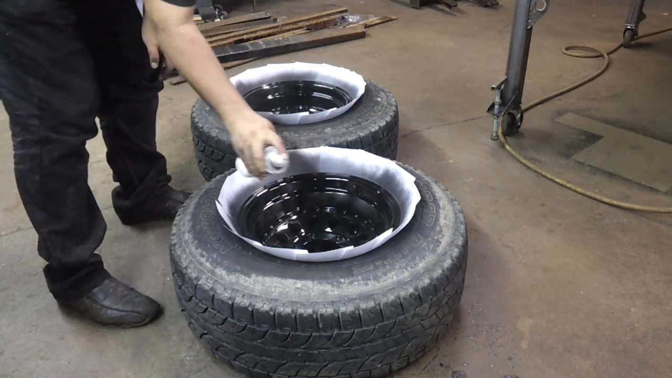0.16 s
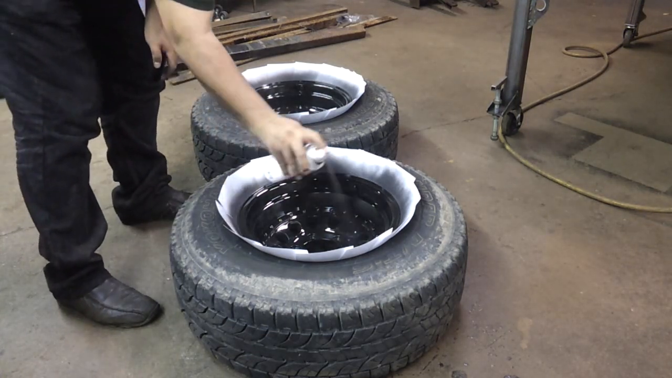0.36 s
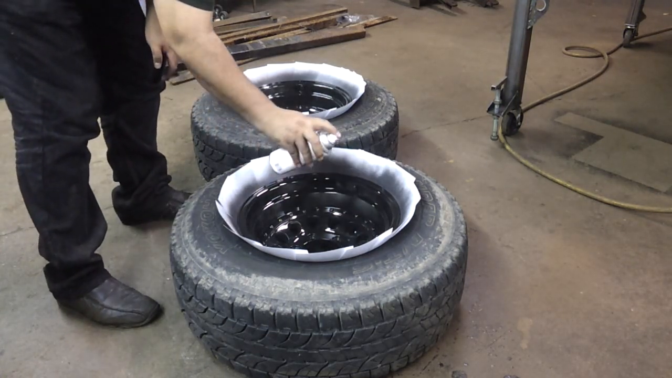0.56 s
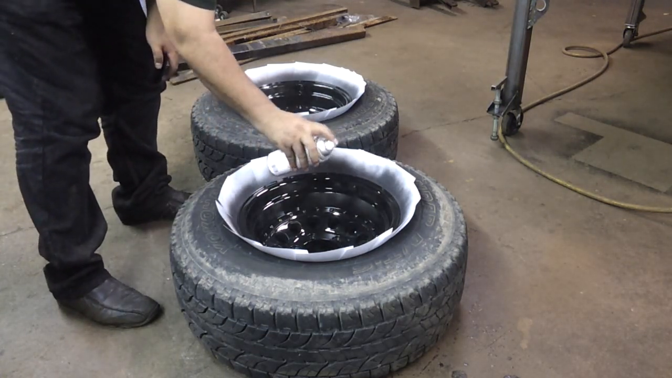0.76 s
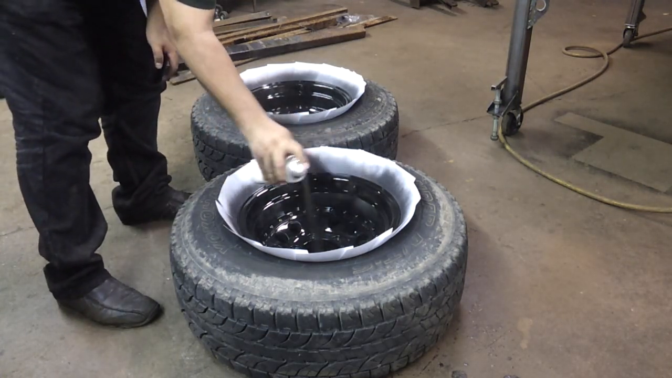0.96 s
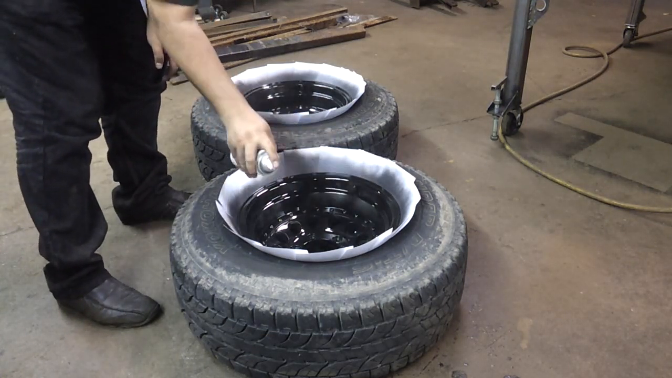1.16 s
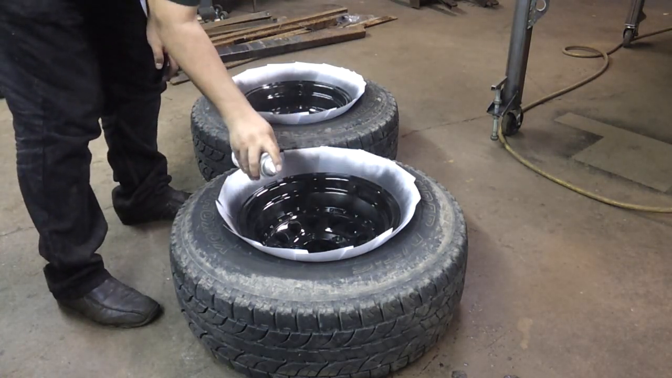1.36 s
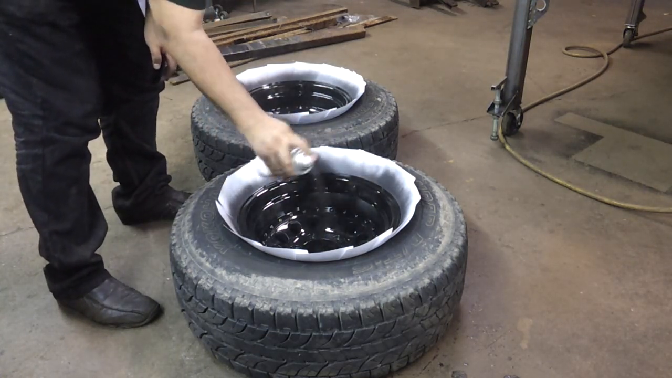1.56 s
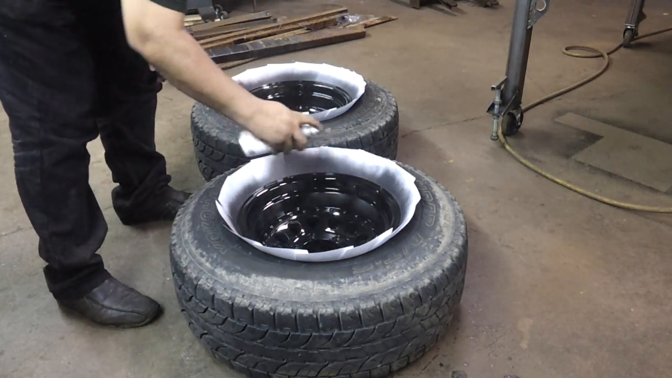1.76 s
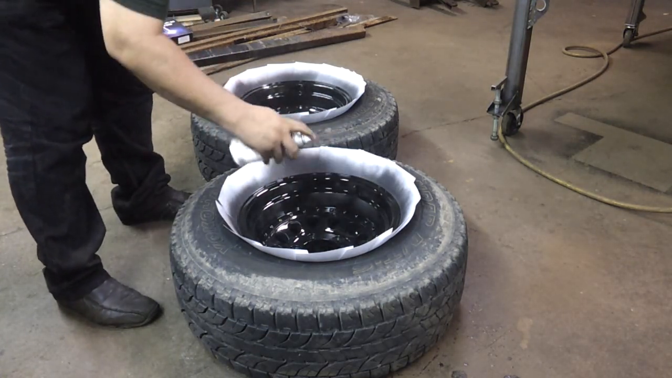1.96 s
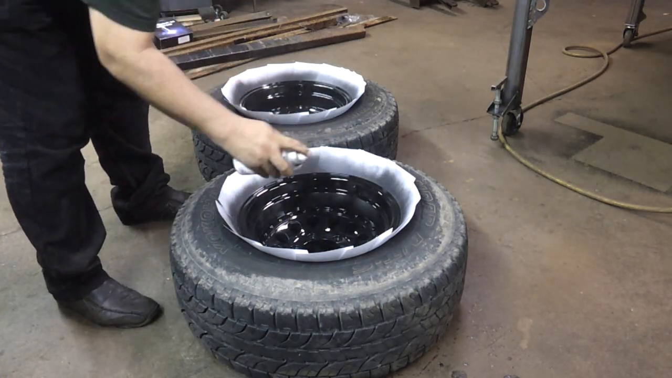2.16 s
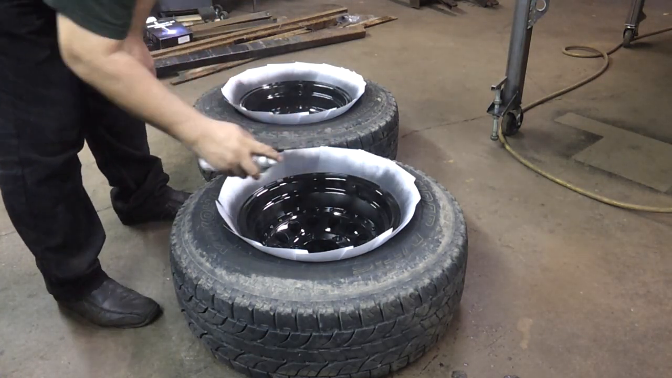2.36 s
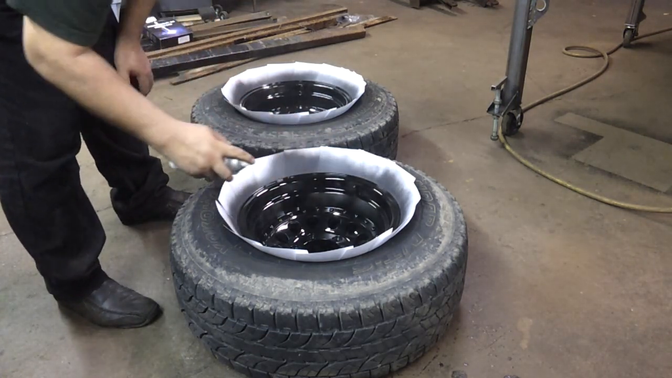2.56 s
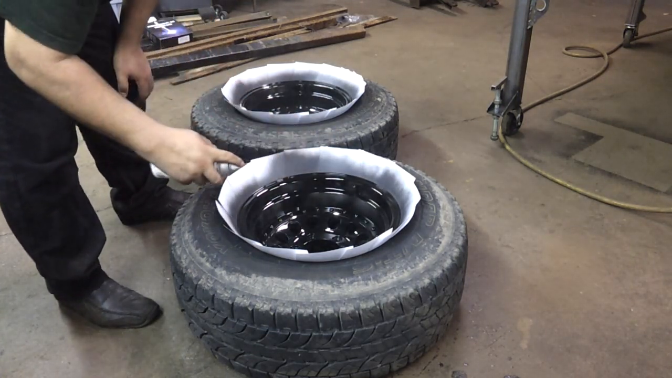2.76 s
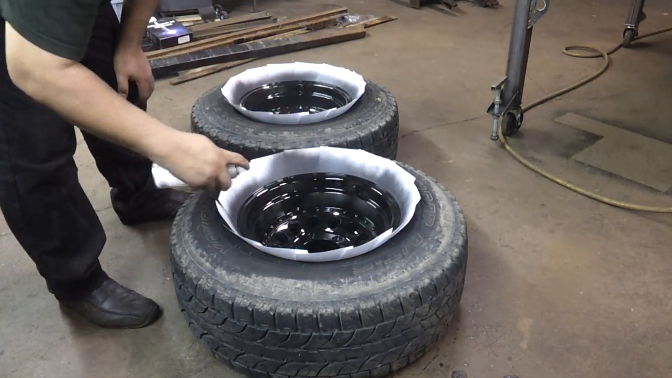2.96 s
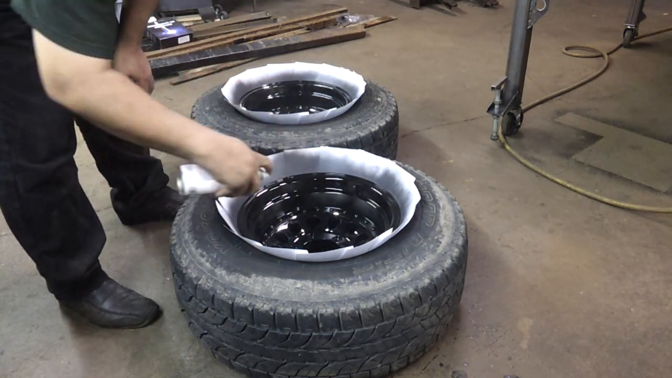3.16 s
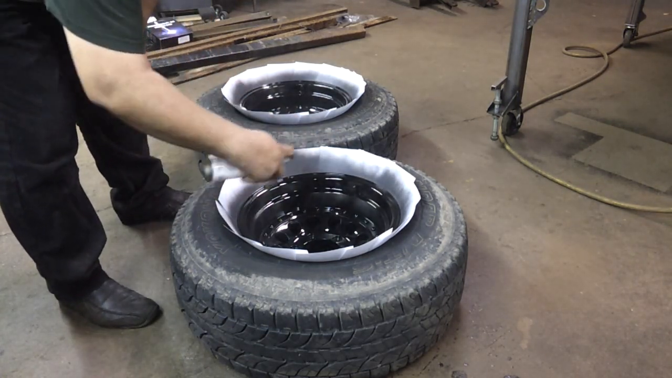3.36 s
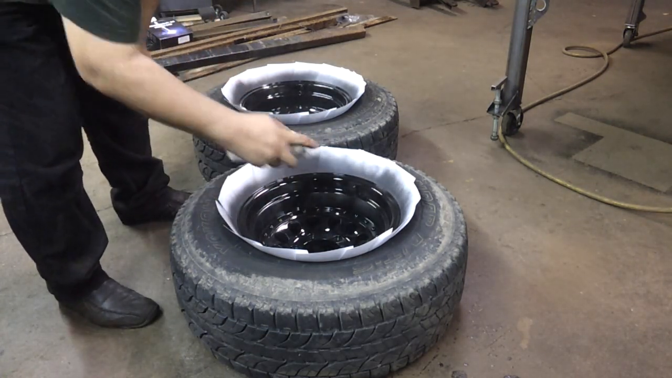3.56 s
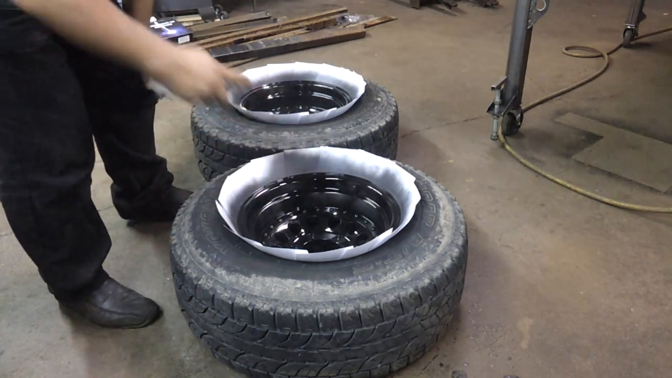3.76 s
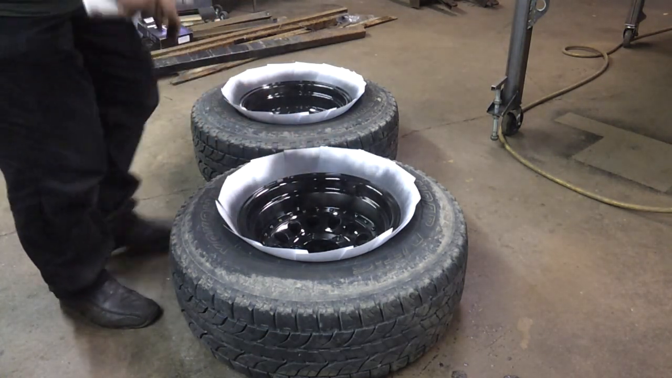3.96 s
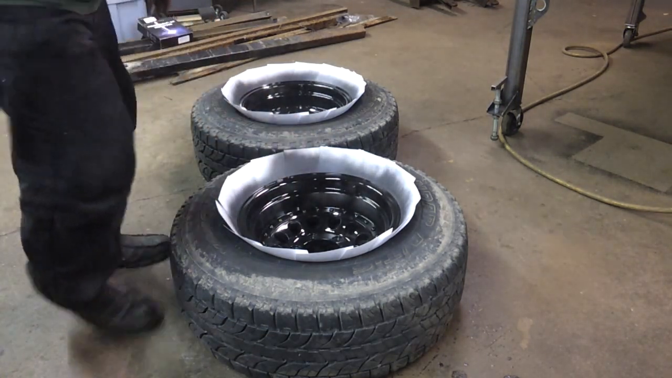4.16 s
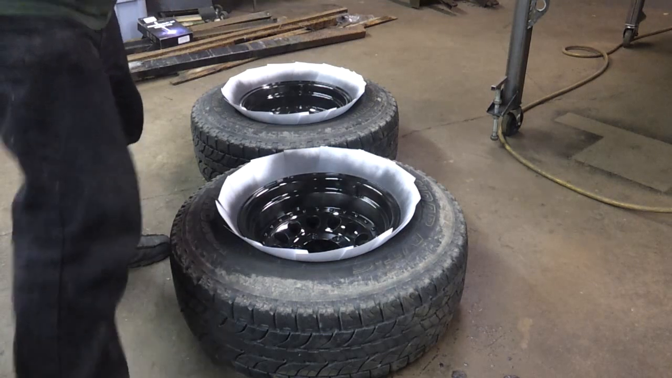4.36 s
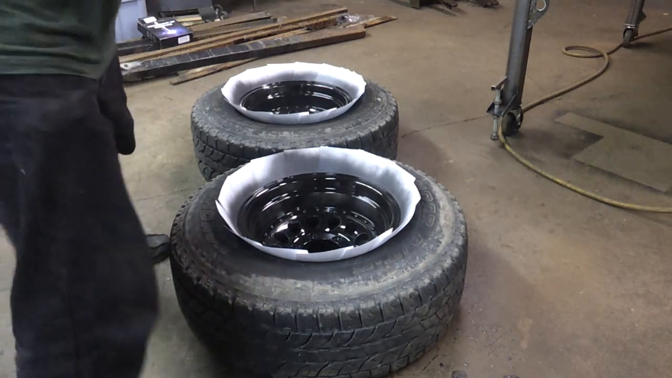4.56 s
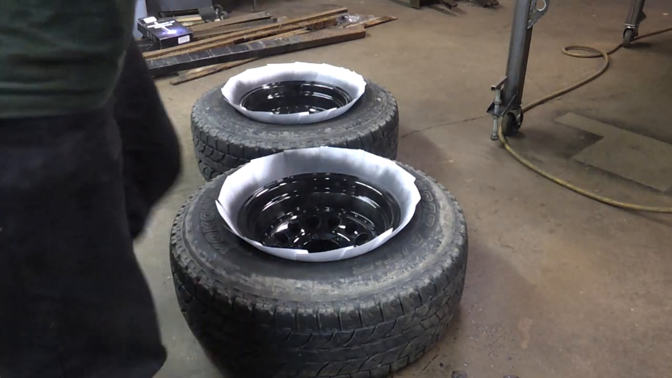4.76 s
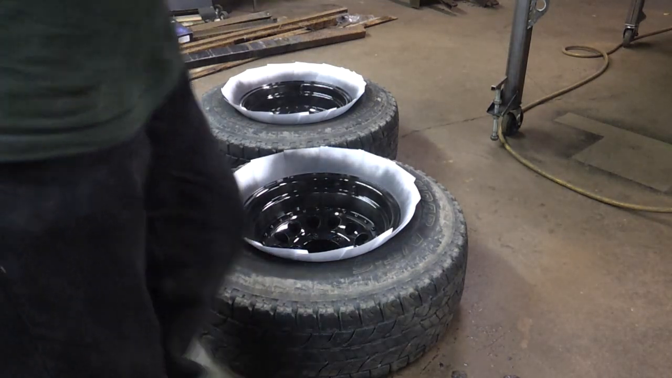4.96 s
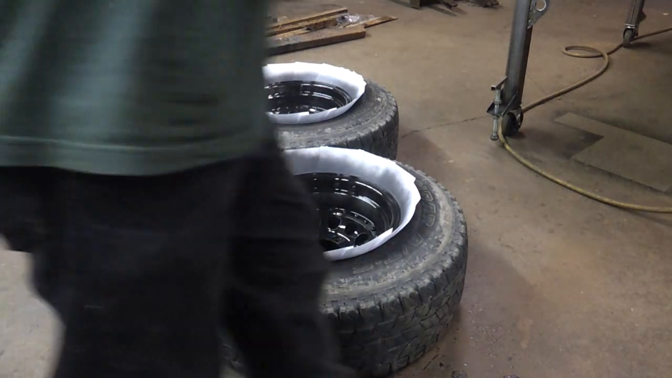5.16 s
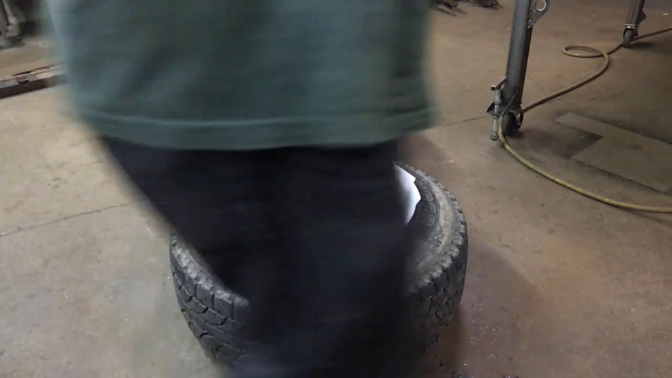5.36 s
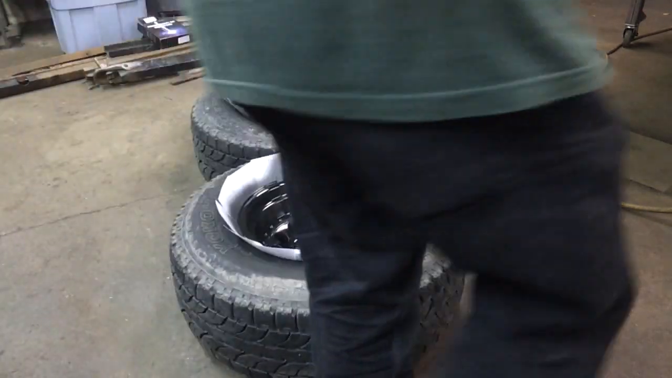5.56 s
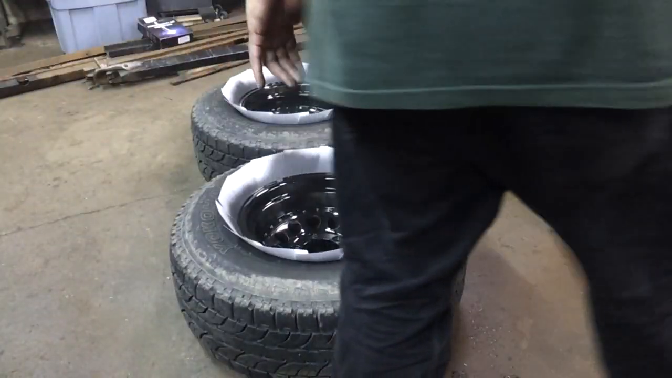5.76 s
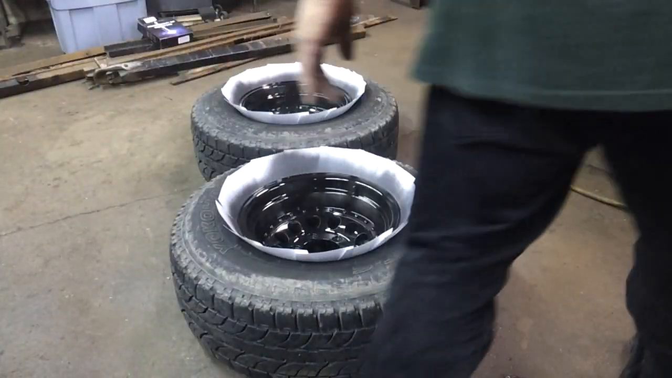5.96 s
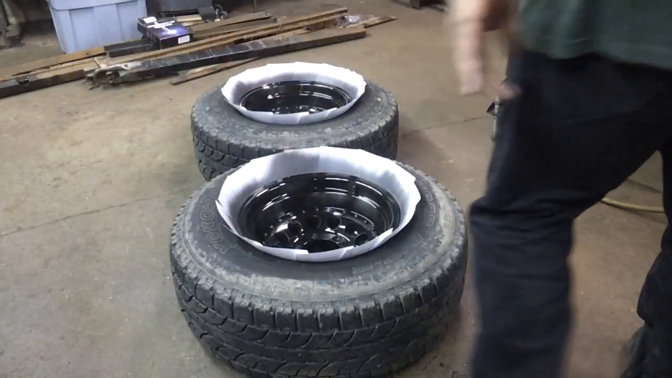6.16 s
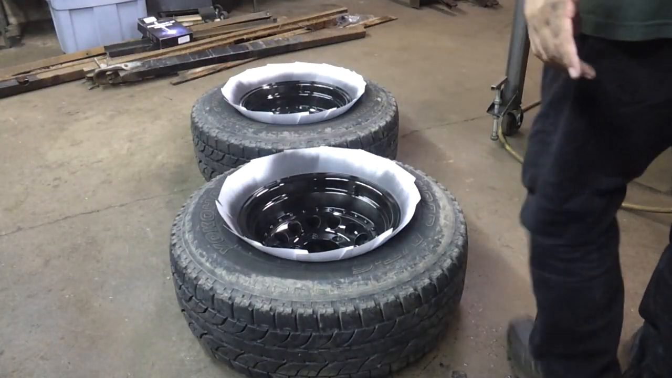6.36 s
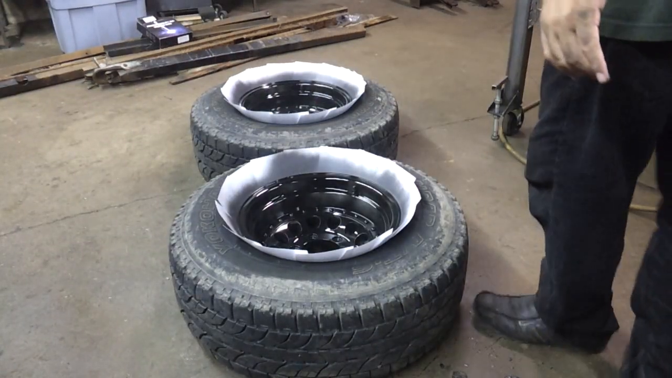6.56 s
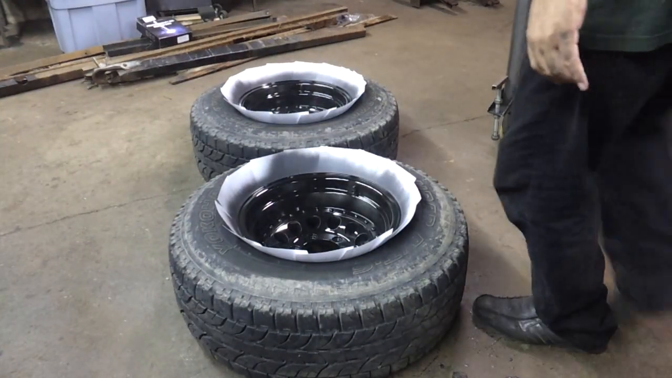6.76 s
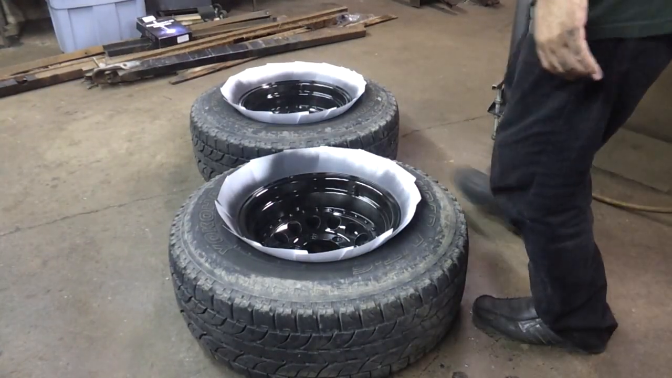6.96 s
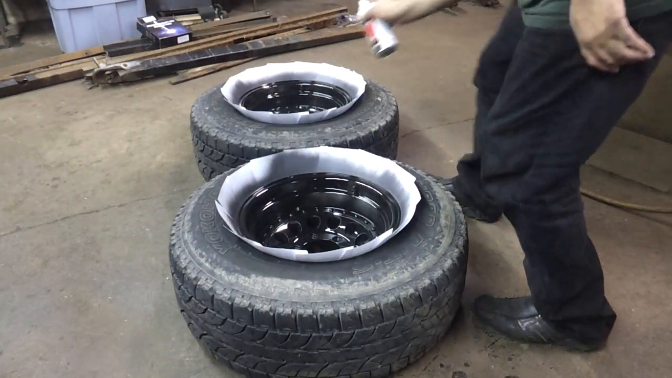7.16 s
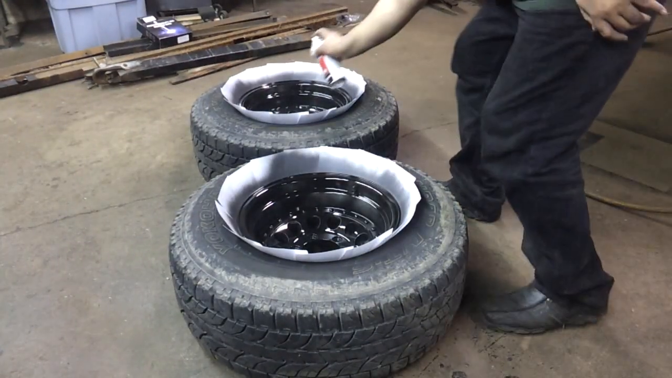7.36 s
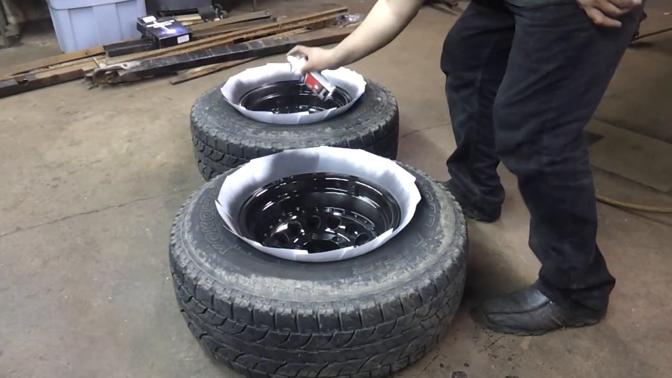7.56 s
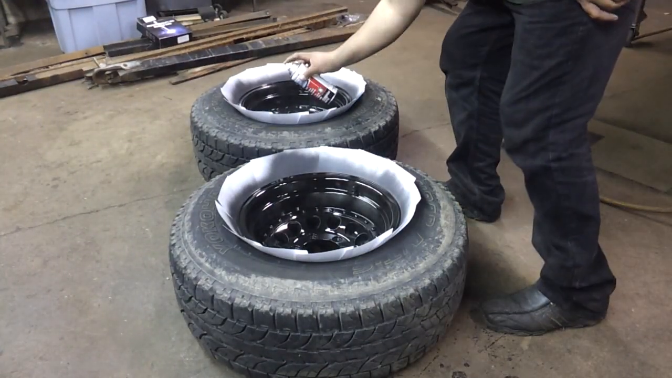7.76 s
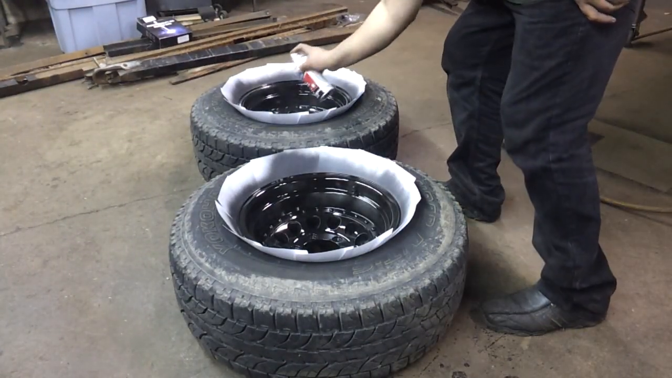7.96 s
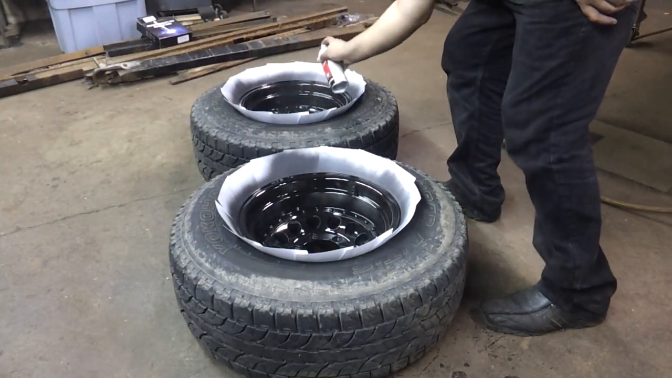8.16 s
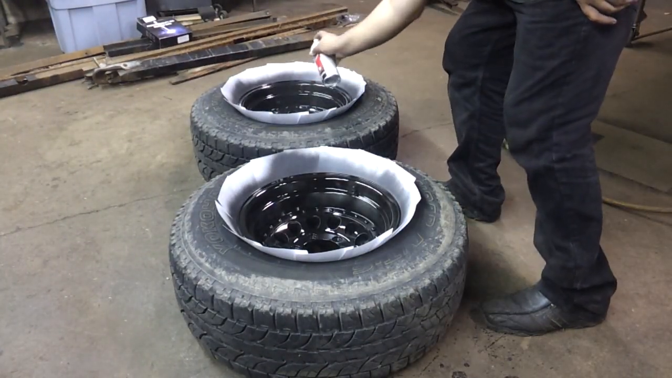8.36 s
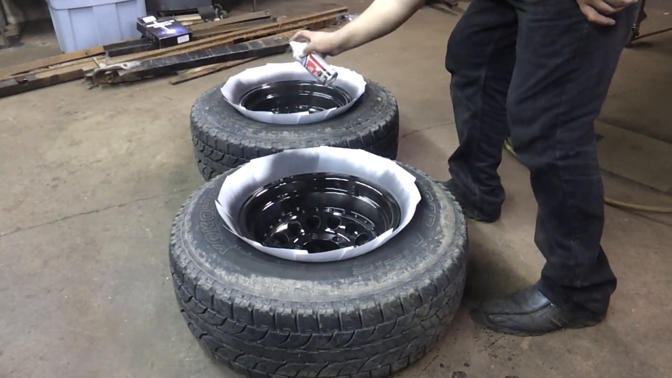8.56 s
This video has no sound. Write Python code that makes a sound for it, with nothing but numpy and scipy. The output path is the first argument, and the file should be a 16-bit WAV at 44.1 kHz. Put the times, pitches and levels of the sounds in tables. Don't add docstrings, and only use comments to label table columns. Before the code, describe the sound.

Short aerosol puffs, then a can's mixing ball clacking hard while shoes thud and scuff on concrete, then three more puffs over low ventilation rumble.

```python
import sys
import numpy as np
from scipy import signal
from scipy.io import wavfile
from scipy.ndimage import uniform_filter1d

SR = 44100
rng = np.random.default_rng(int(sys.argv[2]) if len(sys.argv) > 2 else 0)


def volts(x):
    e = np.asarray(x, float) / 20
    return 10 ** e


def put_to_file(sound):
    columns = np.atleast_2d(sound).T
    safe = np.clip(columns, -1, 1)
    whole_steps = np.round(safe * 32767)
    wavfile.write(sys.argv[1], SR, whole_steps.astype(np.int16))


N = 383652


def evened(x):
    return x / np.sqrt(np.mean(x ** 2) + 1e-20)


def read(points, hz):
    f, value = np.transpose(points)
    return np.interp(np.log(hz + 1), np.log(f + 1), value)


def add(mix, s, sound):
    part = mix[round(s * SR):][:len(sound)]
    part += sound[:len(part)]


def noise(points, patchy_db, size):
    hz = np.fft.rfftfreq(size, 1 / SR)
    a, b, patches = rng.standard_normal((3, len(hz), N * 4 // size + 5))
    patches = uniform_filter1d(patches, size // 64, 0)
    patches = evened(uniform_filter1d(patches, 16384 // size, 1))
    z = (a + 1j * b) * volts(read(points, hz)[:, None] + patchy_db * patches)
    return evened(signal.istft(z, nperseg=size, noverlap=size * 3 // 4)[1][:N])


def resonate(x, hz, width):
    r = np.exp(-np.pi * width / SR)
    return signal.lfilter([1 - r], [1, -2 * r * np.cos(2 * np.pi * hz / SR), r * r], x)


def ringing(modes, push, widen):
    x = 0
    for k, (hz, width, db) in enumerate(modes):
        steep = resonate(resonate(push, hz, widen * width), hz, 3 * width)
        x = x + (-1) ** k * volts(db) * steep * np.sin(2 * np.pi * hz / SR) ** 2
    return x / abs(x).max()


def air():
    # frequency in Hz, density in dB per Hz.
    hiss = [(180, -76), (300, -1.5), (398, -7), (432, -8), (462, -7), (700, -8.5), (1770, -14.5),
            (1930, -15), (4140, -17), (4650, -20), (6700, -24), (10300, -20), (15900, -23.5)]
    # frequency in Hz, density in dB per Hz.
    fan = [(15, -50), (25, -40), (34, -41), (59, 3.5), (75, -11), (96, -8.5), (129, 4.5), (167, 2),
           (197, -2.5), (217, 0.5), (275, 1.5), (305, -16), (328, -5), (382, -16), (420, -10), (550, -15.5),
           (920, -120)]
    # frequency in Hz, width in Hz, level in dB.
    duct_modes = [(71.3, 4.8, -10), (119.6, 10, -8), (196, 17, -8.5)]
    # time in seconds, level in dB.
    drone_level = [(0.0, -38), (0.8, -34.5), (1.1, -37), (3.1, -34.5), (4.24, -34.5), (4.45, -38), (4.7, -34.5),
                   (5.16, -37.5), (5.6, -37), (6.05, -35), (6.7, -33), (7.0, -40), (7.2, -34), (7.5, -34),
                   (8.3, -35), (8.55, -29), (8.7, -34.5)]
    hiss_db = -33
    ducts = sum(volts(g) * evened(resonate(rng.standard_normal(N), hz, width)) for hz, width, g in duct_modes)
    swell = volts(np.interp(np.arange(N) / SR, *np.transpose(drone_level)))
    drone = swell * (noise(fan, 0.74, size=4096) + ducts)
    return volts(hiss_db) * noise(hiss, 1.0, size=1024) + drone


def hall(x):
    # frequency in Hz, t60 in seconds.
    decay = [(200, 0.46), (1000, 1), (3000, 0.98), (8000, 0.96), (15000, 0.46)]
    out, turn = np.zeros(N), np.arange(N) / SR * 2.3
    age = np.arange(SR) / SR
    for k in range(3):
        taps = np.zeros(SR)
        at = np.arange(150, SR - 12, 12)
        taps[at + rng.integers(0, 12, len(at))] = rng.choice([-1., 1.], len(at))
        taps *= 1 - np.exp(-age / 0.0035)
        taps *= 1 + 0.31 * np.exp(-((age - .055) / 0.0047) ** 2)
        hz, t, z = signal.stft(taps, SR, nperseg=256)
        tail = signal.istft(z * volts(-60 * t / read(decay, hz)[:, None]), SR, nperseg=256)[1]
        share = np.sqrt(2 / 3) * np.cos(np.pi * (turn + k / 3))
        out += signal.fftconvolve(x * share, tail / np.linalg.norm(tail))[:N]
    return out


def drags():
    # start in seconds, length in seconds, sole in dB, grit in dB.
    scuffs = [
        (3.77, 0.14, -33, -35),
        (3.985, 0.066, -26, -27.5),
        (5.834, 0.17, -24, -28),
        (6.525, 0.16, -38, -36),
        (6.665, 0.12, -50, -32),
        (6.936, 0.11, -38, -35),
        (7.03, 0.21, -33, -34.5),
        (7.215, 0.23, -28, -28),
    ]
    bite, drag_db = 0.12, -8.5
    out = np.zeros((2, N))
    for s, length, sole_db, grit_db in scuffs:
        u = np.arange(0, length, 1 / SR) / length
        stroke = np.minimum(u / bite, 1) * volts(drag_db * u) * np.minimum(10 * (1 - u), 1)
        add(out[0], s, volts(sole_db) * stroke)
        add(out[1], s, volts(grit_db) * stroke)
    return out


def shoes():
    # start in seconds, peak in dB, thud in Hz, slap in dB re peak, t60 in seconds.
    steps = [(3.977, -30.5, 364, 21.5, 0.11), (4.456, -2, 262, -3, 0.076), (5.831, -8.5, 257, -3, 0.092),
             (5.894, -10.5, 335, 0, 0.098), (6.026, -16.5, 197, -27, 0.51), (6.545, -13, 352, -1, 0.17),
             (7.043, -13.5, 280, -6, 0.095), (7.14, -16, 266, -18, 0.08), (7.239, -16, 230, -8, 0.08),
             (7.312, -14, 457, -16, 0.1), (7.35, -19, 487, -10, 0.065)]
    # frequency in Hz, density in dB per Hz.
    sole = [(180, -41), (300, 4), (872, -1.5), (982, -3.5), (2080, -3.5), (2440, -8), (7000, -18),
            (9100, -45), (15400, -120)]
    # frequency in Hz, density in dB per Hz.
    grit = [(2650, -9), (4500, -7), (6060, -12), (6920, -9), (7610, -8), (11000, -12.5), (16000, -18)]
    t, out = np.arange(9000) / SR, np.zeros(N)
    for s, db, hz, slap_db, t60 in steps:
        t60 = max(t60, .01)
        push = 9 * (t == 0) + rng.standard_normal(9000) * volts(-60 * t / t60)
        thud = resonate(resonate(push, hz, 9 / t60), hz, 175)
        slap = resonate(resonate(push, 680, 870), 790, 970)
        add(out, s, volts(db - 5.5) * (thud / abs(thud).max() + volts(slap_db) * slap / abs(slap).max()))
    sole_gain, grit_gain = drags()
    return out + sole_gain * noise(sole, 2., size=512) + grit_gain * noise(grit, 1.3, size=512)


def slosh():
    # time in seconds, sliding level in dB.
    swing = [
        (4.06, -15),
        (4.22, -19),
        (4.27, -23),
        (4.666, -12.5),
        (5.42, -5.5),
        (5.664, -26),
        (5.75, -30),
    ]
    # frequency in Hz, width in Hz, level in dB.
    modes = [(1200, 1600, -4), (1920, 850, -3.5), (3530, 820, 4.5)]
    clicks = (rng.random(N) < 1200 / SR) * rng.choice([-1, 1], N)
    clicks = clicks * volts(6.5 * np.minimum(rng.exponential(1, N), 3.5))
    level_db = np.interp(np.arange(N) / SR, *np.transpose(swing), left=-120, right=-120) - 12.0
    return volts(level_db) * evened(ringing(modes, clicks, 0.9))


def ball(blows, chatter_db, chatter_s):
    # time in seconds, bright modes in Hz, ring in Hz.
    tilt = [(1.87, 7460, 3220), (4.1, 7420, 3200), (4.23, 7800, 3420), (4.36, 6770, 3320),
            (4.65, 6820, 3230), (4.755, 7420, 3310), (4.96, 8100, 3200), (5.06, 7040, 3460),
            (5.27, 7200, 3430), (5.44, 7500, 3500), (6.21, 7040, 3160), (6.7, 8700, 3200),
            (7.23, 7300, 3260)]
    # multiple of the ring Hz, width in Hz, level in dB.
    ring_modes = [(1, 330, 0), (.75, 900, -14), (1.14, 550, -8)]
    # frequency in Hz, width in Hz, level in dB.
    thump = [(1200, 385, 5), (1940, 336, 0.5)]
    # frequency in Hz, width in Hz, level in dB.
    shoulder = [(3990, 950, 0), (6200, 3200, -12.5)]
    # multiple of the bright Hz, width in Hz, level in dB.
    bright_modes = [(0.998, 915, 1), (1.38, 1200, -5), (1.7, 2200, -11.5), (1.95, 2430, -13)]
    dip = 0.8
    small = signal.butter(2, 520, "high", fs=SR, output="sos")
    t, near, far = np.arange(2500) / SR, np.zeros(N), np.zeros(N)
    click, (when, brights, rings) = 1. * (t == 0), np.transpose(tilt)
    for s, db, thump_db, shoulder_db, bright_db in blows:
        chatter = volts(chatter_db) * rng.standard_normal(2500) / (1 + (t / chatter_s) ** 3)
        hz, ring_hz = np.interp(s, when, brights), np.interp(s, when, rings)
        bright = [(min(k * hz, 15500), width, g) for k, width, g in bright_modes]
        ring = [(k * ring_hz, width, g) for k, width, g in ring_modes]
        sides = (near, click + chatter, 1, 0), (far, click + 0.11 * chatter, 1.3, 2.5)
        for out, push, widen, lift_db in sides:
            groups = ((ring, 0), (thump, thump_db - 2.0 * lift_db), (shoulder, shoulder_db),
                      (bright, bright_db + lift_db))
            x = volts(db + 3.5) * sum(volts(g) * ringing(modes, push, widen) for modes, g in groups)
            dipped = signal.lfilter(*signal.iirnotch(dip * hz, 4.5, SR), x)
            add(out, s, signal.sosfilt(small, 0.6 * x + 0.5 * dipped))
    return near, far


def valve():
    # start in seconds, peak in dB, frequency in Hz.
    spits = [(0.1395, -11.5, 2960), (0.38, -13.5, 3030), (0.7672, -19, 11000), (0.7836, -10, 10650),
             (0.79, -16, 2430), (1.379, -18, 8000), (1.3931, -21, 12500), (1.4015, -14, 2920),
             (1.425, -10, 2740), (3.1514, -23, 8500), (7.373, -11.5, 9170), (7.832, -16.5, 8900),
             (7.844, -25, 3060), (8.49, -10.5, 8340)]
    t, out = np.arange(1500) / SR, np.zeros(N)
    for s, db, hz in spits:
        gas = rng.standard_normal(1500) * volts(-60 * t / 0.1)
        spit = resonate(resonate(gas, hz, 460), hz, 960)
        add(out, s, volts(db - 1.0) * spit / abs(spit).max())
    return out


def valve_rule():
    # start in seconds, held in seconds, jet in dB, whistle in dB re jet, whistle in Hz.
    presses = [
        (-0.3, 0.33, -19, -12, 2900),
        (0.13, 0.28, -13.5, -2, 2940),
        (0.773, 0.3, -14, -17, 2520),
        (1.391, 0.245, -14.5, -2, 2850),
        (3.147, 0.24, -15.5, -6.5, 2830),
        (7.355, 0.235, -16.5, -6, 2840),
        (7.835, 0.22, -16, -10, 2980),
        (8.475, 0.14, -14.5, -15, 2760),
    ]
    open_s, shut_db = 0.042, -23.5
    build_db, build_s = -1.5, 0.075
    sag_db_per_s, close_db_per_s = 25, 123
    settle_s, whistle_sag_hz_per_s = 0.085, 450
    out = np.full((4, N), -120.)
    for s, held, db, tone_db, tone_hz in presses:
        first = max(round(s * SR), 0)
        t = np.arange(first, min(first + SR, N)) / SR - s
        late = np.maximum(t - open_s, 0)
        shape_db = shut_db * np.clip(1 - t / open_s, 0, 1) ** 1.6 + build_db * np.exp(-late / build_s)
        shape_db -= sag_db_per_s * late + close_db_per_s * np.maximum(t - held, 0)
        pitch = tone_hz - whistle_sag_hz_per_s * np.minimum(late, held)
        out[:, first:first + SR] = [db + shape_db, np.exp(-late / settle_s) - 1, tone_db + 0 * t, pitch]
    return out


def spray():
    # frequency in Hz, density in dB per Hz.
    jet_curve = [(1470, -44), (2400, -9.5), (2900, -3), (3180, -13), (3660, -9.5), (4150, -4), (5980, -5),
                 (8370, 3.5), (10500, 3.5), (12300, 3), (14300, -1), (16100, -7)]
    roar_band = (1470, 4400)
    whistle_width_hz = 130
    whistle_fade_db, roar_fade_db = 19, 10.5
    jet_db, start, whistle_db, hz = valve_rule()
    flutter, breathy, other, low = rng.standard_normal((4, N))
    narrow = signal.butter(2, whistle_width_hz, fs=SR, output="sos")
    band = signal.sosfilt(narrow, breathy + 1j * other)
    whistle = evened((band * np.exp(2j * np.pi * np.cumsum(hz) / SR)).real)
    roar = evened(signal.sosfilt(signal.butter(2, roar_band, "band", fs=SR, output="sos"), low))
    jet = noise(jet_curve, 1.4, size=512) * volts(0.54 * evened(uniform_filter1d(flutter, 150)))
    tones = volts(whistle_db - 7.0 + whistle_fade_db * start) * whistle
    tones += volts(-10.5 + roar_fade_db * start) * roar
    return volts(jet_db + 1.5) * (jet + tones)


def scene():
    # start in seconds, peak in dB, then thump, shoulder and bright modes in dB re peak.
    knocks = [(1.8707, -11.5, -1, -4, 6), (2.577, -12.5, -9.5, -13, 0), (4.0565, -5, -9, -18.5, 0),
              (4.2222, 0.5, -6, -7, -4.5), (4.2334, -23, 0, -15, -5), (4.3625, -7.5, 1.5, -18, 5),
              (4.6427, -2, -2, -6, 0), (4.7691, -1, -2.5, 6.5, 5.5), (4.9576, -6.5, 3.5, -2, 7.5),
              (5.0714, -2.5, -4, -9, 2.5), (5.0882, 5.5, -13, 2.5, 1.5), (5.2697, -6.5, 2, 1.5, 9),
              (5.436, -5.5, -7, 3.5, -6)]
    ticks = [(4.1305, -21, 8, 4, 10), (4.2394, -7, -4, -8, 1), (4.2444, -15, -7, -14, 4),
             (4.2784, -13.5, 6, -6, -6), (4.4223, -16.5, 8, -8, -7), (4.4824, -14, 7, -6, 0),
             (4.5504, -11, -4, -26.5, -10), (4.5684, -14, 8.5, -16, -18), (4.5864, -4.5, -7, -17, -11),
             (4.6714, -19, 10.5, -15, -11), (4.8623, -6.5, -6, 3, -15), (4.8764, -13, 2, -1, -14),
             (4.9824, -17, 6.5, -13, -6), (5.1367, -9, -8, -14, -13), (5.4194, -9.5, -1.5, -9, 4),
             (5.5294, -29, 19.5, 17, -7), (5.5722, -16, 7.5, 0, 0), (5.6834, -18, -1.5, -8, -4),
             (5.8544, -30, -6, 0, 7)]
    shaded = [
        (2.8709, -31, -5, 4, 6),
        (3.078, -34, -23, -9, -5),
        (3.1252, -25.5, -9, -7, -5),
        (6.2137, -23.5, -2.5, -20, 0.5),
        (6.6956, -39, -6, -23, 17),
        (7.233, -26, -22, 4, 2),
    ]
    skids = [
        (4.2263, -7.5, 5, 0, 1.5),
        (4.5105, 1.5, -6, -6.5, -9.5),
        (4.7538, 4, -6, -4, -5),
        (5.06, -3, -28, 3, -0.5),
    ]
    jet, feet = spray() + valve(), shoes()
    knock, knock_far = ball(knocks, -15.5, 0.0024)
    tick, tick_far = ball(ticks, -20.5, 0.002)
    hidden, hidden_far = ball(shaded, -9, 0.0033)
    slam, slam_far = ball(skids, -1.4, 0.01)
    blows_far = volts(5.5) * knock_far + volts(5.0) * tick_far + volts(10) * hidden_far + volts(-1.5) * slam_far
    echoes = hall(volts(-6.5) * jet + blows_far + volts(-3.0) * feet)
    low_cut = signal.butter(2, 90, "high", fs=SR, output="sos")
    can = jet + volts(1.5) * (knock + tick + hidden) + slam + slosh()
    mono = can + signal.sosfilt(low_cut, feet + echoes) + air()
    return np.array([mono, mono])


def band_limit(x):
    return signal.sosfilt(signal.butter(12, 15800, fs=SR, output="sos"), x)


def record(dry):
    power_db = 10 * np.log10(abs(uniform_filter1d(dry[0] ** 2, 300)) + 1e-12)
    fall = np.arange(N) * 20.0 / SR
    over_db = np.maximum(np.maximum.accumulate(power_db + fall) - fall + 8.5, 0)
    ducked = dry / volts(.5 * uniform_filter1d(over_db, 150))
    return band_limit(1.128 * np.tanh(ducked / 1.316))


dry = scene()
out = record(dry)
put_to_file(out)
```